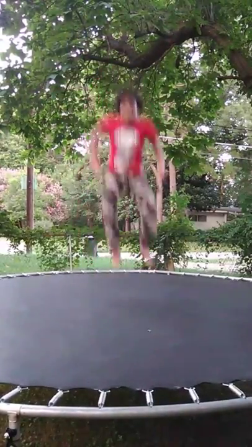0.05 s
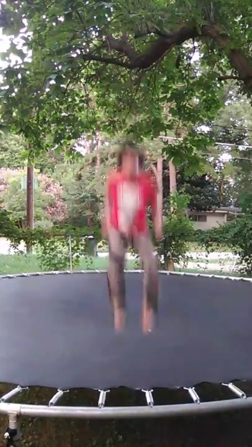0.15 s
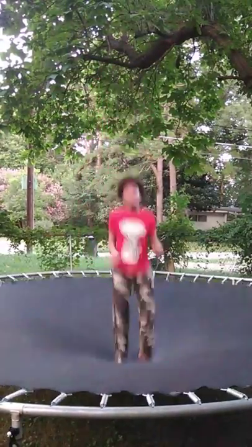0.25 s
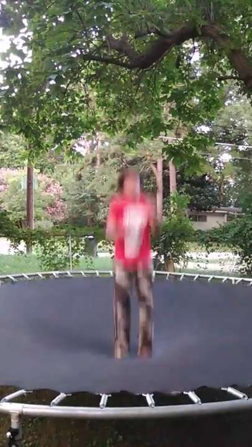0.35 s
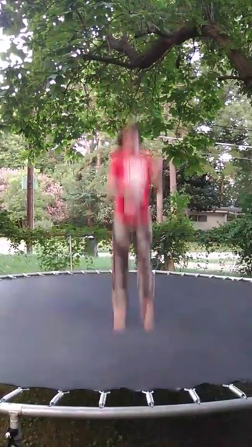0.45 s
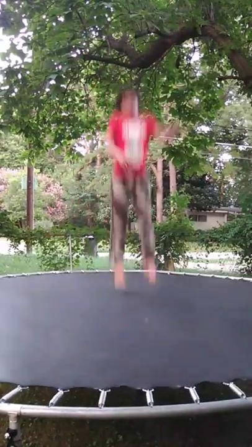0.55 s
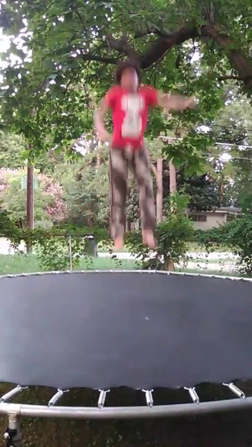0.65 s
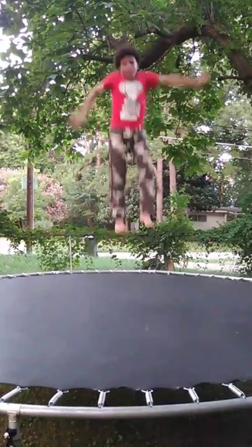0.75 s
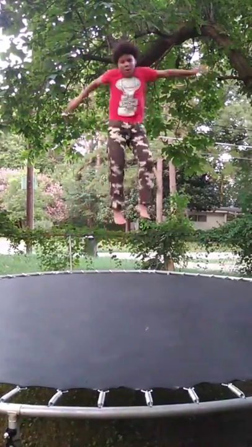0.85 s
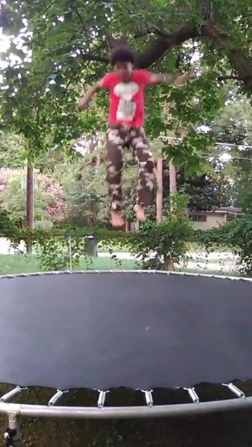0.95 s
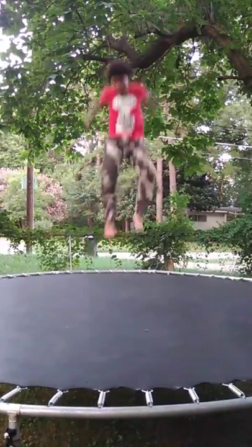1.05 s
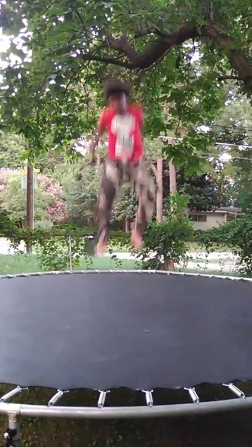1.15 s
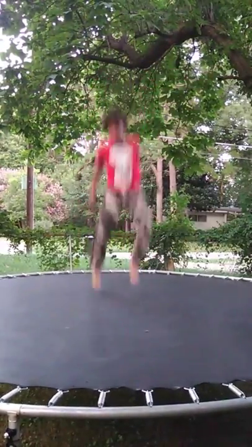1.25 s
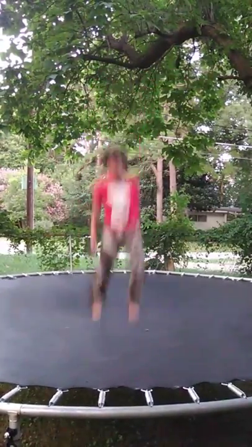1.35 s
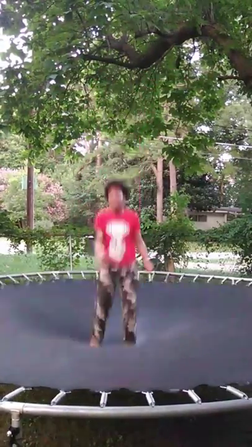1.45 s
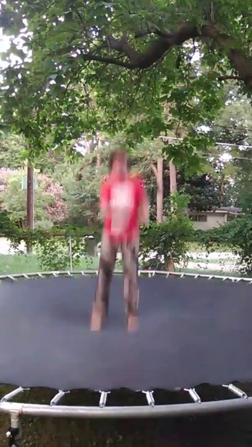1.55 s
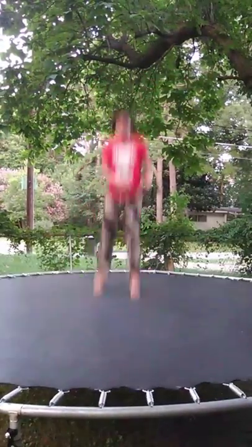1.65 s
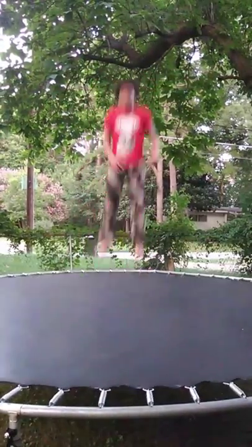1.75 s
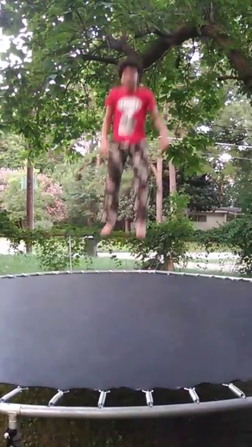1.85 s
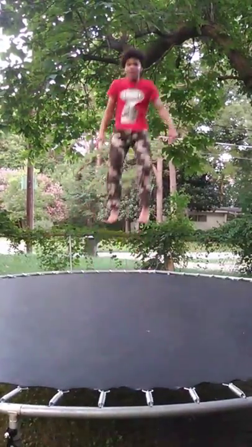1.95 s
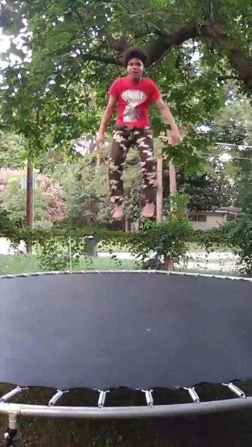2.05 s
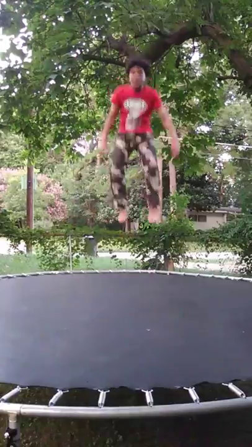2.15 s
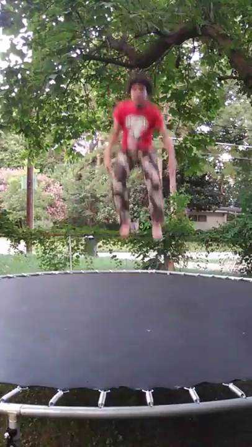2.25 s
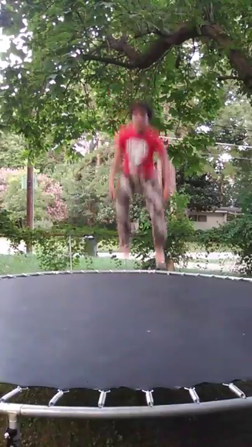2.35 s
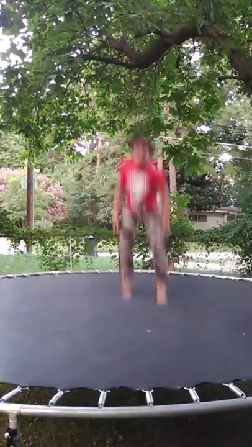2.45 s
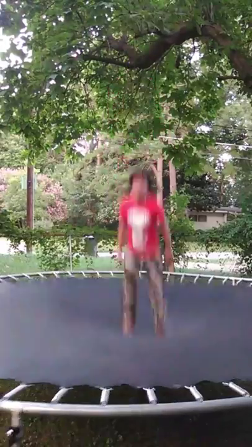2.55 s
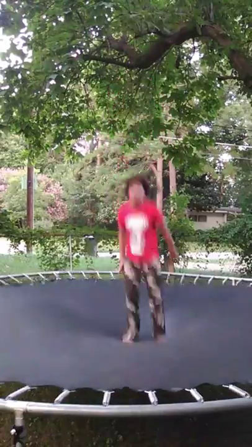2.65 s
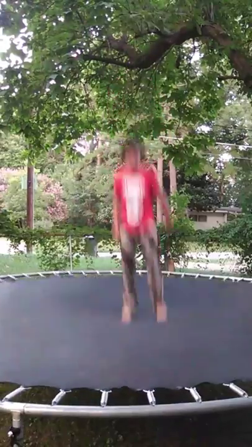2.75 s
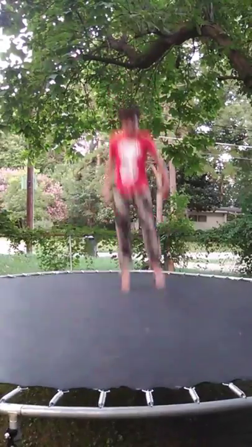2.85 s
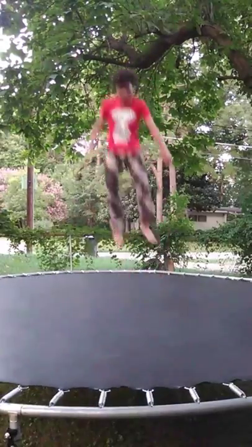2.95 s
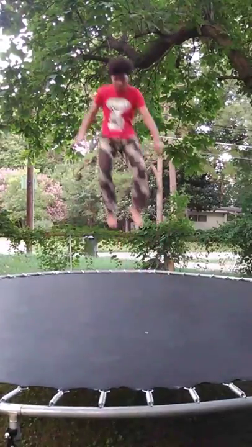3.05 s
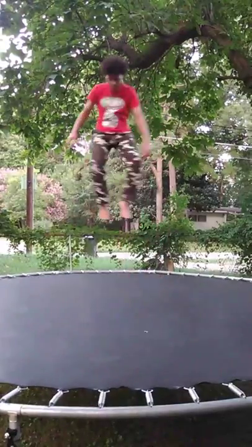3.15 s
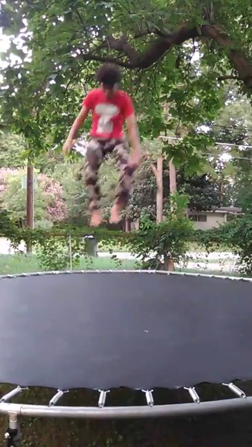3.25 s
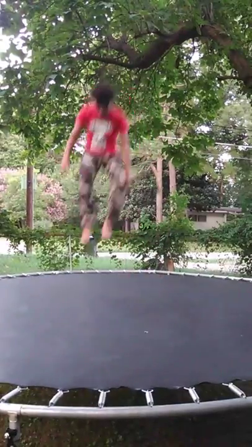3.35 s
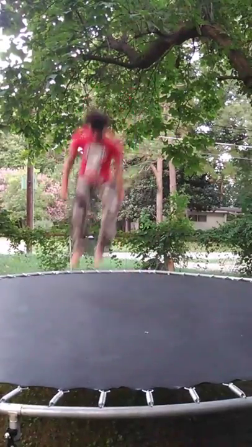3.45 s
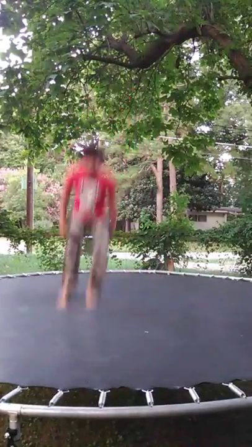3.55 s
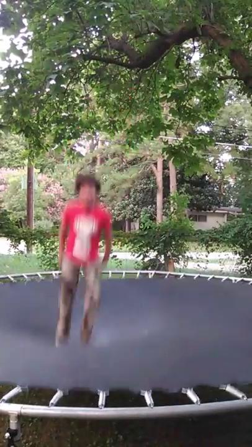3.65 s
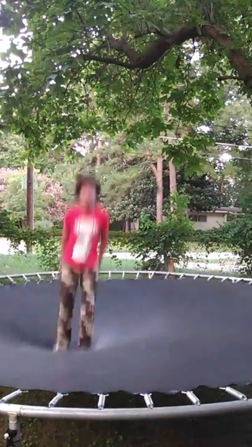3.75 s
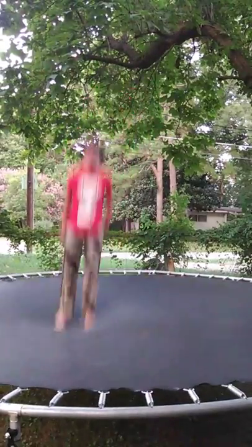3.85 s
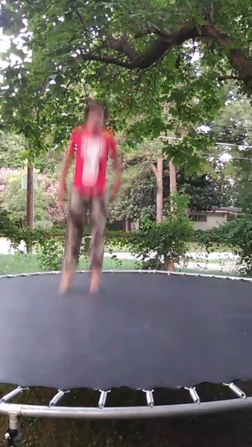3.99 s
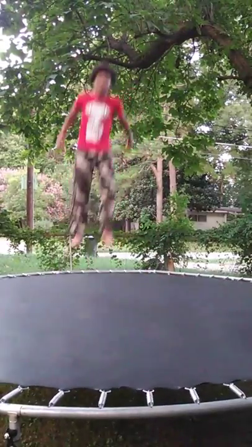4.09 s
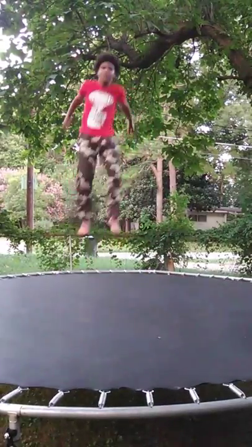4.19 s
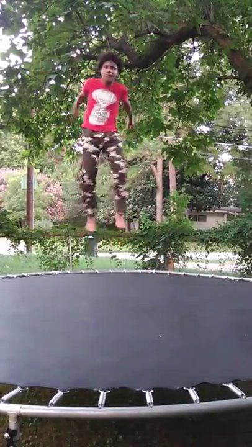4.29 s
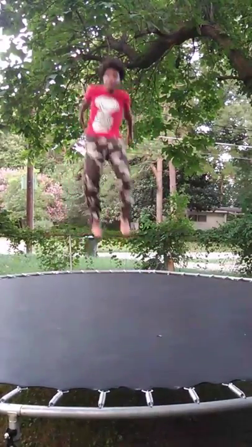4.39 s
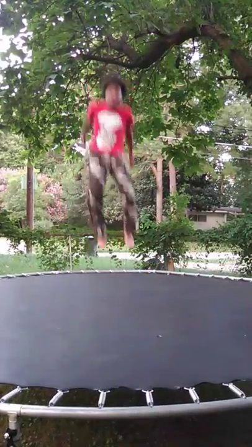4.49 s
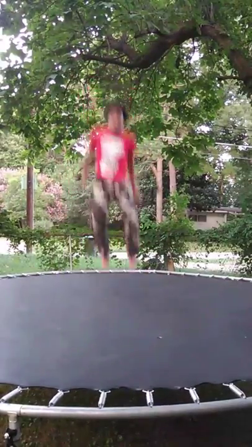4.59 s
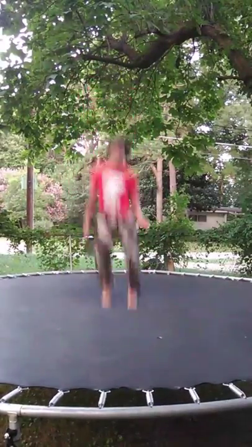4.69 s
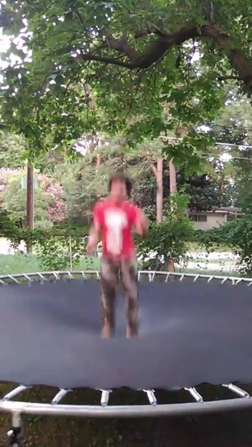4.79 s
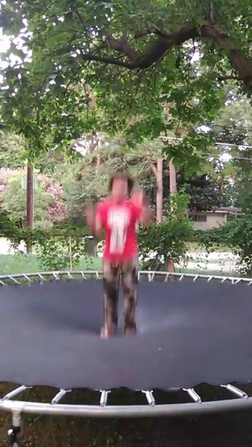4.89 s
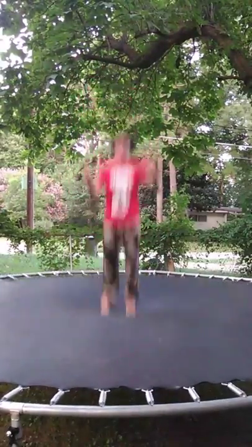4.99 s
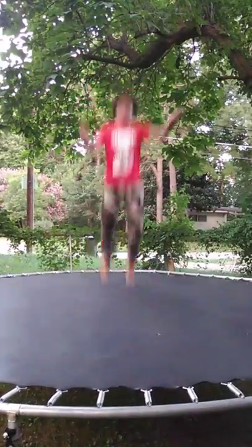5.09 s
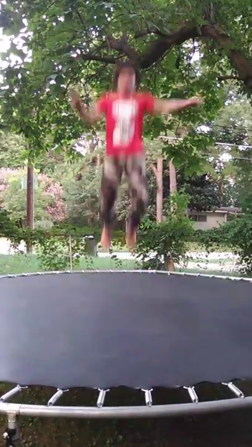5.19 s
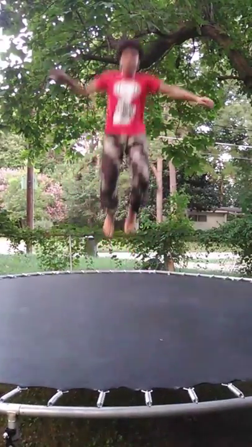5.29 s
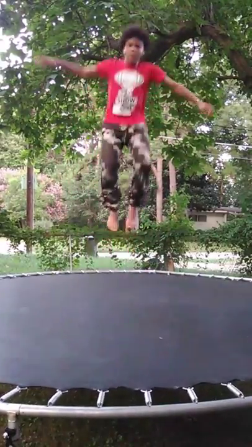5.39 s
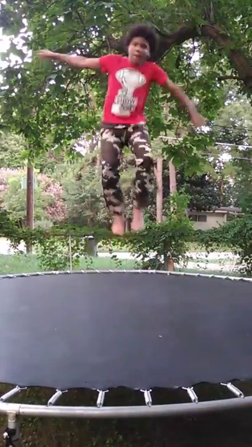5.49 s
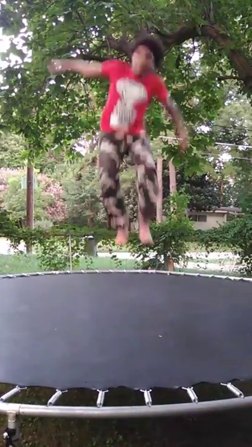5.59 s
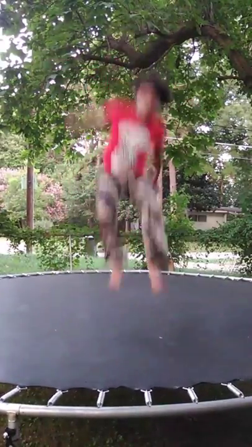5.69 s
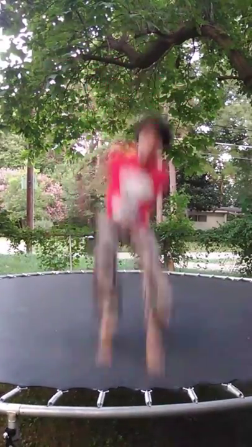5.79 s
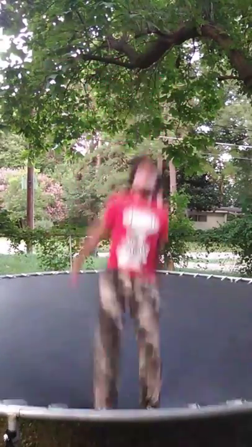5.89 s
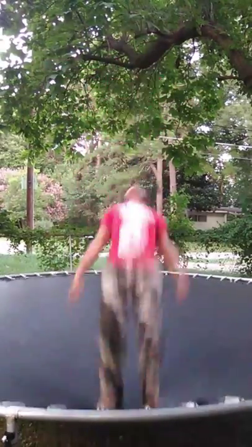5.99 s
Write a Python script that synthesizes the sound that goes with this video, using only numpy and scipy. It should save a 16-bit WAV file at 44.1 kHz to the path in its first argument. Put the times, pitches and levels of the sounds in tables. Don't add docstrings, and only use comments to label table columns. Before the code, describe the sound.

Someone bounces on a garden trampoline: bright raspy spring squeaks in down-and-up pairs, jingling hooks, dull thuds, near silence during each flight.

```python
import sys
import numpy as np
from scipy import signal
from scipy.fft import rfft, irfft, next_fast_len
from scipy.io import wavfile
from scipy.ndimage import uniform_filter1d

SR = 44100
rng = np.random.default_rng(int(sys.argv[2]) if len(sys.argv) > 2 else 0)


def volts(x):
    e = np.asarray(x, float) / 20
    return 10 ** e


def unload_wav(signal):
    wavfile.write(
        sys.argv[1],
        SR,
        np.round(np.clip(np.atleast_2d(signal).T, -1, 1) * 32767).astype(np.int16),
    )


N = 265923

# frequency_hz, density_db (per Hz)
RUB_COLOUR = [(200, -39), (400, -33), (800, -23), (1400, -18.5), (1800, -22.5), (2500, -16.5),
              (3200, -19.5), (4300, -17), (5800, -14.5), (7000, -5), (7900, 0), (9000, -12.5),
              (10200, -20.5), (14000, -18.5), (15700, -31)]


def unit(x):
    return x / np.sqrt(np.mean(x ** 2))


def tilt(points):
    hz, db = np.transpose(points)
    bin_hz = np.fft.rfftfreq(next_fast_len(N), 1 / SR)
    return volts(np.interp(np.log(bin_hz + 1), np.log(hz), db))


def colour(x, points):
    size = next_fast_len(N)
    return unit(irfft(rfft(x, size) * tilt(points), size)[:N])


def walk(rate):
    hold = int(SR / rate)
    levels = np.repeat(rng.standard_normal(N // hold + 1), hold)
    return unit(uniform_filter1d(levels, hold)[:N])


def ring(modes, length_s=0.3):
    t = np.arange(int(length_s * SR)) / SR
    total = 0
    for hz, db, t60 in modes:
        decay = np.exp(-np.log(1000) * t / t60) / np.sqrt(t60)
        total = total + volts(db) * np.sin(2 * np.pi * hz * t) * decay
    return np.minimum(t / 0.0034, 1) * total


def yard():
    # frequency_hz, density_db (per Hz)
    bed_colour = [(20, -9), (55, 3.5), (95, 4.5), (200, -4), (400, -10.5), (900, -12), (1500, -24),
                  (2400, -19), (4500, -33.5), (6300, -34), (7700, -8), (9200, -34), (15000, -33.5)]
    # frequency_hz, level_db (rms)
    hum_tones = [(58, -76.5), (90, -73.5), (147, -79.5)]
    t = np.arange(N) / SR
    sound = colour(rng.standard_normal(N), bed_colour) * volts(-67 + 1.2 * walk(2.3))
    for hz, db in hum_tones:
        level = volts(db + 2.2 * walk(7.5)) * np.sqrt(2)
        sound = sound + level * np.sin(2 * np.pi * hz * t + 0.6 * walk(2.0))
    return sound


def thumps():
    # start_s, peak_db, pitch_hz, t60_s
    knocks = [(0.309, -35.5, 77, 0.11), (2.614, -40, 172, 0.12), (2.66, -44, 89, 0.13),
              (3.606, -45, 114, 0.11), (3.647, -43.5, 85.6, 0.085), (4.169, -51, 78.1, 0.067),
              (4.199, -50, 89.5, 0.081), (4.236, -43.5, 98, 0.08), (4.273, -57, 99.6, 0.09),
              (4.317, -52, 85.5, 0.11), (4.357, -47, 98, 0.084), (4.391, -48.5, 95, 0.068),
              (5.838, -37, 174, 0.17), (5.863, -32, 80.5, 0.081), (5.965, -41, 70.0, 0.18),
              (5.995, -40.5, 78.1, 0.1)]
    t = np.arange(int(0.25 * SR)) / SR
    tone, gate = np.zeros((2, N + len(t)))
    for s, db, hz, t60 in knocks:
        i = int(s * SR)
        turns = hz * (0.8 * t + 0.41 * 0.01 * (1 - np.exp(-t / 0.012)))
        swell = volts(db) * (1 - np.exp(-t / 0.0039)) * np.exp(-np.log(1000) * t / t60)
        tone[i:i + len(t)] -= 1.7 * swell * np.sin(2 * np.pi * turns)
        gate[i:i + len(t)] += swell
    rumble_colour = [(30, -17.5), (70, 6.0), (170, 1.5), (400, -14.0), (1000, -48)]
    rumble = colour(rng.standard_normal(N), rumble_colour)
    return tone[:N] + 0.65 * gate[:N] * rumble


def feet():
    # start_s, peak_db, pitch_hz, t60_s
    footfalls = [(0.185, -53.5, 371, 0.11), (1.319, -46, 314, 0.025), (1.346, -53.5, 330, 0.046),
                 (2.491, -55.5, 402, 0.15), (2.55, -43, 365, 0.042), (2.62, -34, 249, 0.05),
                 (3.601, -50.5, 364, 0.082), (4.623, -53, 290, 0.068), (4.726, -49.5, 480, 0.12),
                 (5.821, -47, 222, 0.16), (5.921, -22, 590, 0.032)]
    t = np.arange(int(0.15 * SR)) / SR
    tone, gate = np.zeros((2, N + len(t)))
    for s, db, hz, t60 in footfalls:
        i = int(s * SR)
        swell = volts(db) * (1 - np.exp(-t / 0.008)) * np.exp(-np.log(1000) * t / t60)
        tone[i:i + len(t)] -= swell * np.sin(2 * np.pi * 1.1 * hz * t)
        gate[i:i + len(t)] += swell
    puff_colour = [(60, -12), (150, 1.5), (350, 3.5), (650, -3), (1200, -36.5)]
    puff = colour(rng.standard_normal(N), puff_colour)
    return tone[:N] + 0.98 * gate[:N] * puff


def pings():
    # start_s, pitch_hz, peak_db, t60_s
    lone_coils = [
        (1.49, 2493, -35.5, 0.42),
        (1.615, 1428, -30.5, 0.075),
        (1.63, 2136, -38.5, 0.14),
        (1.8, 2410, -44.5, 0.42),
        (2.735, 2050, -34, 0.12),
        (2.745, 1500, -34, 0.17),
    ]
    out = np.zeros(N)
    for s, hz, db, t60 in lone_coils:
        pair = [(hz, db, t60), (1.035 * hz, db - 2, t60)]
        tone = ring(pair) * np.sqrt(t60)
        i = int(s * SR)
        out[i:i + len(tone)] += tone
    return out * volts(5 * walk(120) - 3.5)


def ticks():
    # start_s, peak_db, rattle_s
    hooks = [(0.047, -27.5, 0.0065), (0.1158, -24.5, 0.015), (0.3106, -12.5, 0.014), (0.442, -13.5, 0.0079),
             (0.783, -15.5, 0.0073), (1.351, -35, 0.0057), (1.9977, -18, 0.017), (2.0415, -13.5, 0.0044),
             (2.3436, -40, 0.017), (3.2207, -36, 0.0093), (3.641, -47.5, 0.0104), (3.8797, -5, 0.0079),
             (4.219, -35, 0.046), (4.3273, -21, 0.011), (4.5991, -22, 0.016), (4.6413, -20, 0.014),
             (4.6854, -17, 0.014), (4.7147, -9.5, 0.0039), (5.0064, -14.5, 0.025), (5.4602, -33.5, 0.013),
             (5.4844, -24, 0.0073), (5.7892, -56, 0.0083), (5.8607, -33, 0.011)]
    t = np.arange(int(0.15 * SR)) / SR
    gate = np.zeros(N + len(t))
    for s, db, rattle_s in hooks:
        i = int(s * SR)
        gate[i:i + len(t)] += volts(db - 12) * np.minimum(t / 0.0056, 1) * np.exp(-t / rattle_s)
    return gate[:N] * colour(rng.standard_normal(N), RUB_COLOUR)


def jingle(count=9000, t60_s=0.14):
    t = np.arange(int(0.084 * SR)) / SR
    fade = np.minimum(t / 0.004, 1) * np.exp(-np.log(1000) * t / t60_s)
    out = np.zeros(N + len(t))
    for start, pitch, size in rng.random((count, 3)):
        i = int(start * N)
        hz = 400 + 15300 * pitch
        out[i:i + len(t)] += volts(10 * size) * fade * np.sin(2 * np.pi * hz * t)
    return unit(out[:N])


def slips():
    # pitch_hz, level_db, t60_s
    coil_modes = [(1512, -6, 0.1), (2465, 0.5, 0.33), (3810, 2.5, 0.12), (4190, 0, .06), (5610, 6.5, 0.056),
                  (7000, 5, 0.33), (7950, -13, 0.22), (8660, 10.5, 0.092), (12400, 6.5, .06)]
    happens, sign, size = rng.random((3, N))
    slipping = happens < 8000 / SR
    clicks = slipping * np.sign(sign - 0.5) * volts(-2.5 * np.log(1 - size))
    clicks = unit(clicks) + 0.89 * rng.standard_normal(N)
    rings = signal.fftconvolve(clicks * volts(2.7 * walk(6)), ring(coil_modes))[:N]
    return clicks + volts(-59) * rings + volts(-1) * jingle()


def strokes(table, parts_db, sag_db_s, slack_s=0.001):
    climb_power = [1.35, 0.69, 0.99, 0.53, 0.6]
    release_db_s = [310, 213, 290, 235, 270]
    weight_share = [-0.15, -0.079, 0.038, 0.19, 0.25]
    t = np.arange(0, N, 32) / SR
    out = 0
    for s, climb_s, db, hold_s, weight_db in table:
        climb = np.clip((t - s) / climb_s, 0, 1) ** np.array(climb_power)[:, None]
        rise = climb * np.clip((t - s) / slack_s, 0, 1) ** 2
        held_s = np.clip(t - s - climb_s, 0, hold_s)
        released_s = np.maximum(t - s - climb_s - hold_s, 0)
        fall_db = sag_db_s * held_s + np.outer(release_db_s, released_s)
        top_db = db + np.add(parts_db, weight_db * np.array(weight_share))
        out = out + (rise * volts(np.maximum(top_db[:, None] - fall_db, -140))) ** 2
    return out


def effort():
    # start_s, climb_s, peak_db, hold_s, weight_db
    landings = [
        (0.197, 0.13, -18.5, 0.031, -3.5),
        (1.362, .11, -18, 0.053, -1.5),
        (2.517, .11, -18.5, 0.027, 2),
        (3.626, 0.11, -19.5, 0.046, 5),
        (4.766, 0.089, -17.5, 0.049, -0.5),
        (5.844, 0.1, -15.5, 0.037, -2.4),
    ]
    # start_s, climb_s, peak_db, hold_s, weight_db
    rebounds = [
        (.425, 0.064, -20, 0.063, 4),
        (1.597, 0.027, -20, 0.096, -0.5),
        (2.715, .045, -21, 0.1, 5),
        (3.87, 0.032, -21.5, 0.1, 12),
        (4.985, 0.034, -20.5, 0.076, 2.5),
    ]
    # start_s, climb_s, peak_db, hold_s, weight_db
    flaps = [
        (.56, 0.031, -29, 0.069, 15.5),
        (1.75, 0.03, -27.5, 0.034, -1),
        (2.86, 0.039, -31.5, 0.06, 3.5),
        (3.99, 0.064, -28.5, 0.086, -4.5),
        (5.09, 0.1, -32.5, 0.076, 4),
        (5.21, 0.045, -35, 0.068, 4),
    ]
    # start_s, climb_s, peak_db, hold_s, weight_db
    rustles = [(.036, 0.036, -37.5, 0.048, 16), (.69, 0.028, -37.5, 0.074, 1),
               (.778, 0.0067, -34.5, 0.1, 1.5), (1.345, 0.012, -42.5, 0.043, -5),
               (1.89, 0.12, -37, .03, -10), (1.985, 0.017, -35.5, .13, -0.5), (2.338, .025, -44.5, 0.05, 4),
               (2.513, .008, -43, .01, -4), (3.01, 0.027, -45, 0.057, 7), (3.11, 0.027, -41.5, 0.057, 7),
               (3.205, 0.014, -38, 0.033, 7), (4.212, 0.025, -34.5, 0.11, -13.5),
               (4.32, 0.038, -33, 0.076, -22), (4.45, 0.022, -41.5, .015, -13),
               (4.59, 0.057, -36, 0.19, -24.5), (4.735, 0.042, -32, .02, -2),
               (5.452, 0.056, -36.5, 0.062, 8), (5.782, 0.013, -43, 0.052, 8.5)]
    # start_s, climb_s, peak_db, hold_s, weight_db
    whispers = [
        (.001, 0.0046, -59, 0.03, .5),
        (1.125, 0.057, -52.5, 0.011, 4),
        (2.22, 0.0096, -61.5, 0.017, 1),
        (3.33, 0.013, -63.5, 0.021, 7.5),
        (5.39, .02, -59, .05, 1),
    ]
    landing_db = [5.5, -1, 1.86, -1.27, -1.7]
    rebound_db = [-3.5, -0.5, -1.2, -2.8, -6]
    flap_db = [-4.5, 2.5, -0.8, -0.8, -4]
    rustle_db = [-9, -2.5, 0.5, -0.1, -3.5]
    whisper_db = [-8, -5, 0.5, 2.7, -28]
    bottom_db = [-5.5, 1.5, 4.5, -3, -0.7]
    landing_sag, rebound_sag, flap_sag, rustle_sag = 14, 33.6, 44, 15.4

    power = strokes(landings, landing_db, landing_sag, slack_s=0.024)
    power = power + strokes(rebounds, rebound_db, rebound_sag)
    power = power + strokes(flaps, flap_db, flap_sag)
    power = power + strokes(rustles, rustle_db, rustle_sag)
    power = power + strokes(whispers, whisper_db, rustle_sag)
    rests = [(s + climb_s + hold_s, 0.01, db - 14.5, 0.12, 0) for s, climb_s, db, hold_s, _ in landings]
    return power + strokes(rests, bottom_db, landing_sag)


def rubbing():
    parts_hz = [450, 1800, 4000, 7500, 13000]
    edges_hz = 200 * 2 ** np.arange(0, 6.6, 0.25)
    parts_db = 10 * np.log10(effort() + 1e-14)
    size = next_fast_len(N)
    spectrum = rfft(colour(slips(), RUB_COLOUR), size)
    bin_hz = np.fft.rfftfreq(size, 1 / SR)
    out = 0
    for lo, hi in zip(edges_hz, edges_hz[1:]):
        place = np.interp(np.log(lo * hi) / 2, np.log(parts_hz), range(5))
        k = min(int(place), 3)
        slice_db = parts_db[k] + (place - k) * (parts_db[k + 1] - parts_db[k])
        band_db = np.interp(np.arange(N) / 32, range(len(slice_db)), slice_db)
        patch_db = 1.31 * walk(25) * min(1, (3500 / lo) ** 0.51)
        band = irfft(spectrum * (bin_hz >= lo) * (bin_hz < hi), size)[:N]
        out = out + band * volts(band_db + patch_db)
    return out * volts(0.38 * walk(40))


def scene():
    near = rubbing() + ticks() + pings()
    t = np.arange(int(0.3 * SR)) / SR
    scatter = rng.standard_normal(len(t)) * np.exp(-t / 0.03)
    echo = signal.fftconvolve(near, scatter)[:N]
    return (near + volts(-61.5) * echo + thumps() + yard() + feet())[None]


def top_cut(x):
    return signal.sosfilt(signal.butter(12, 15780, fs=SR, output="sos"), x)


def record(dry):
    soft = np.tanh(2.2 * dry) / 2.2
    low_pass = signal.ellip(8, 0.1, 40, 15650, fs=SR, output="sos")
    cut = signal.sosfiltfilt(low_pass, soft)
    return top_cut(cut)


dry = scene()
out = record(dry)
unload_wav(out)
```